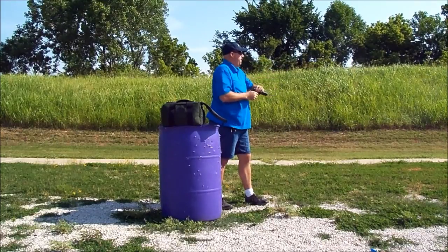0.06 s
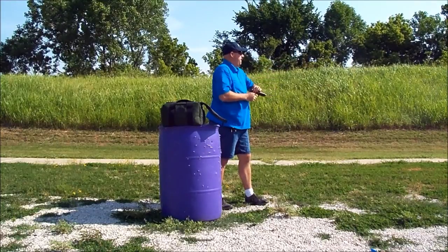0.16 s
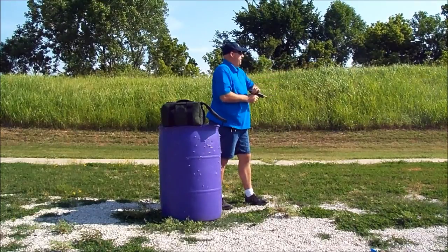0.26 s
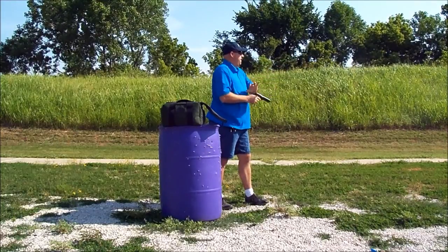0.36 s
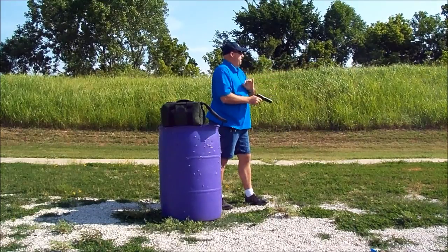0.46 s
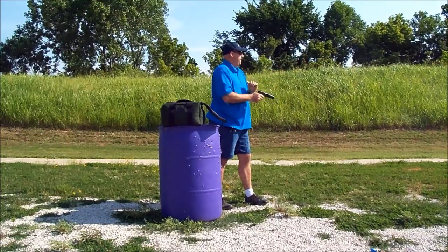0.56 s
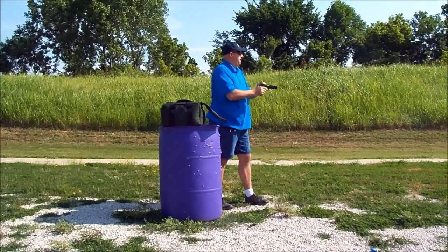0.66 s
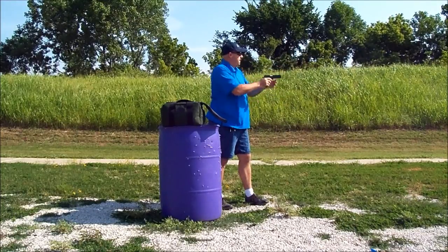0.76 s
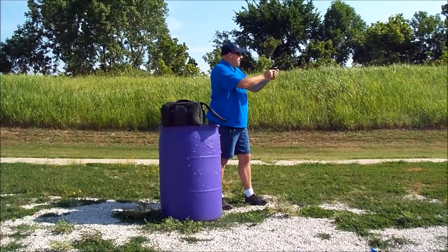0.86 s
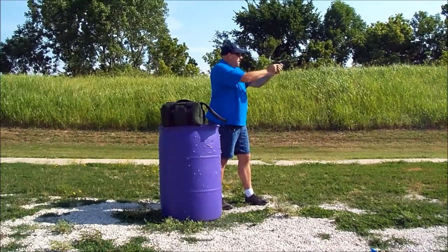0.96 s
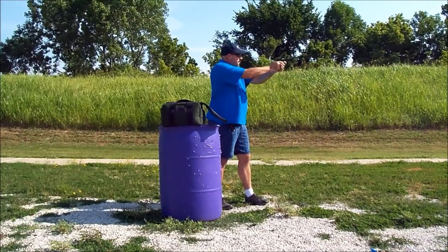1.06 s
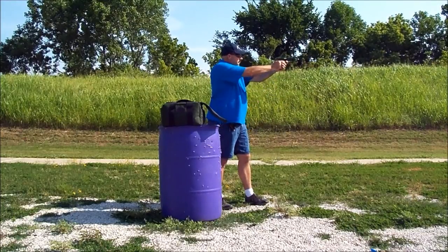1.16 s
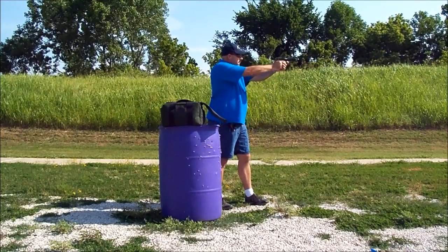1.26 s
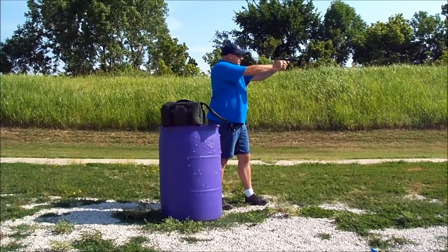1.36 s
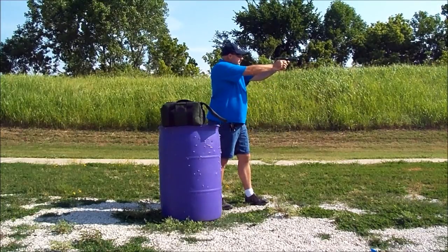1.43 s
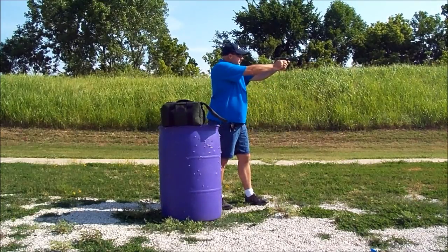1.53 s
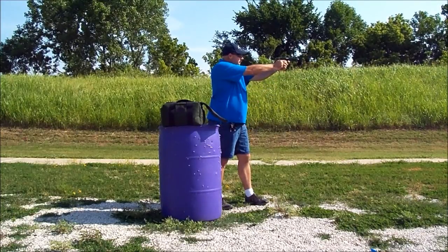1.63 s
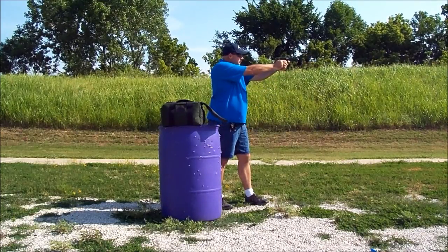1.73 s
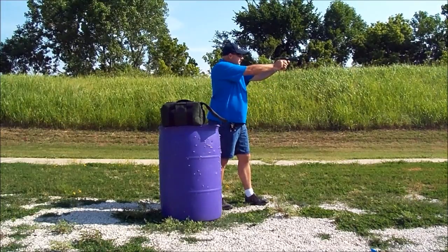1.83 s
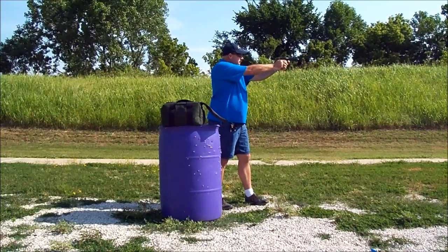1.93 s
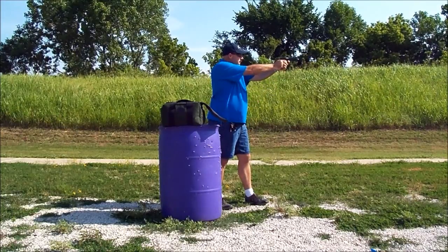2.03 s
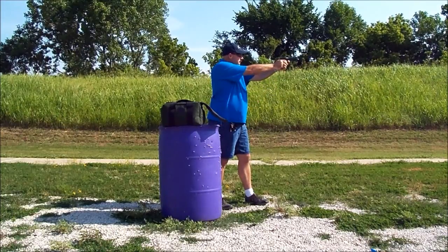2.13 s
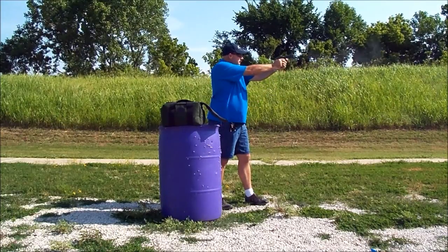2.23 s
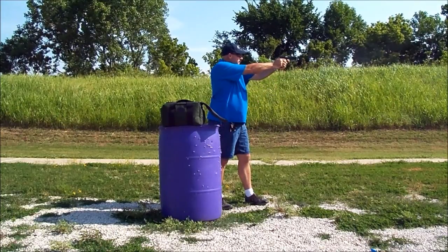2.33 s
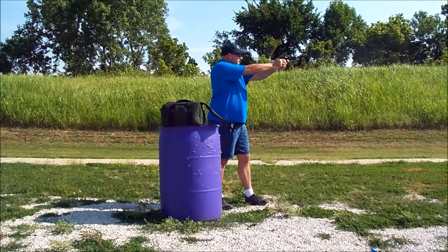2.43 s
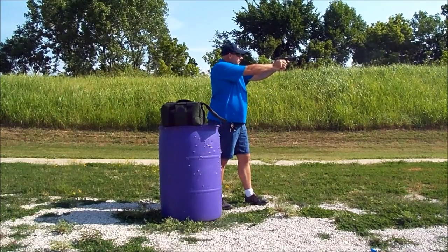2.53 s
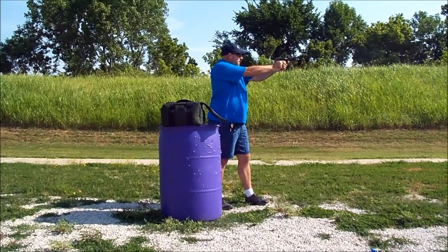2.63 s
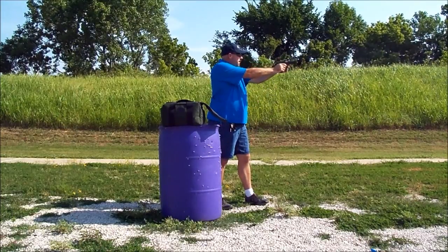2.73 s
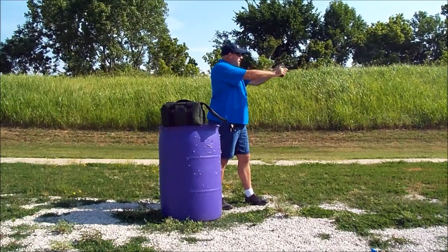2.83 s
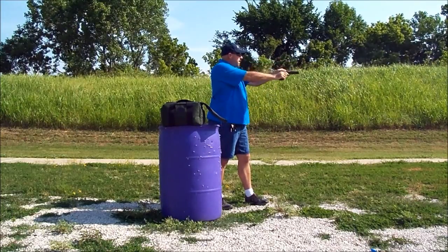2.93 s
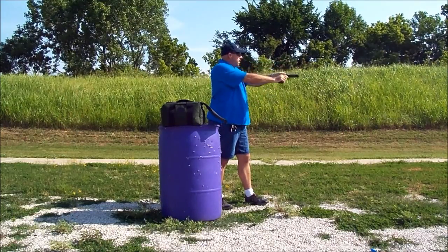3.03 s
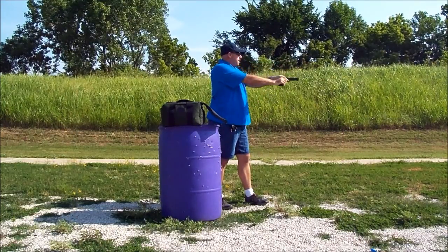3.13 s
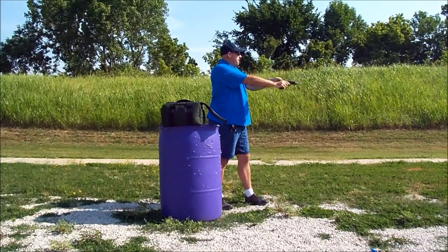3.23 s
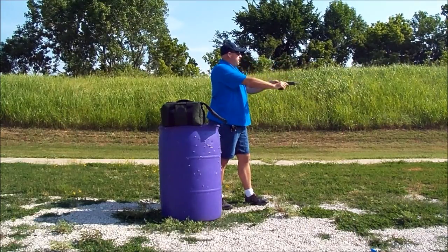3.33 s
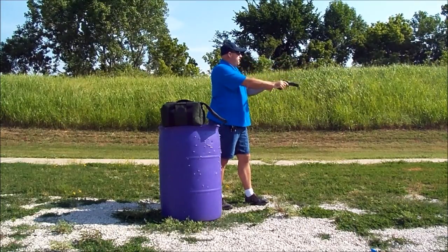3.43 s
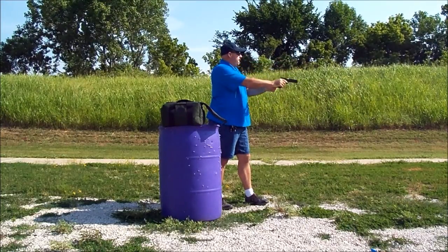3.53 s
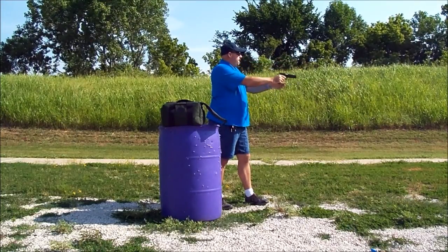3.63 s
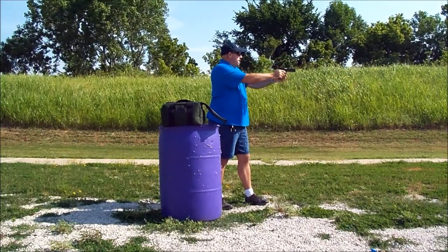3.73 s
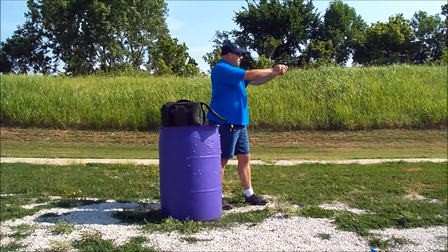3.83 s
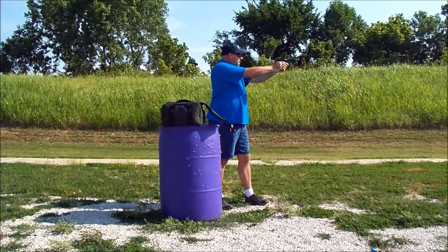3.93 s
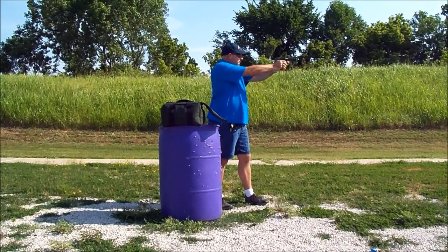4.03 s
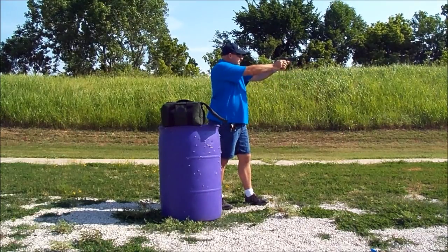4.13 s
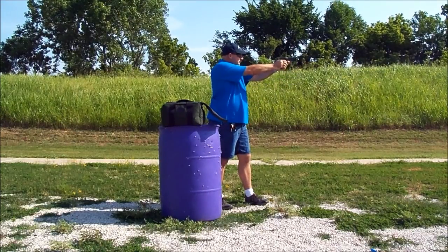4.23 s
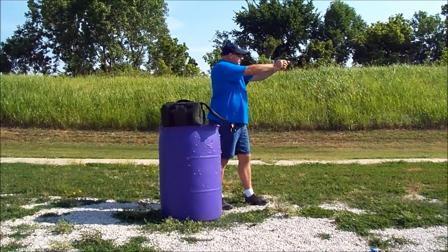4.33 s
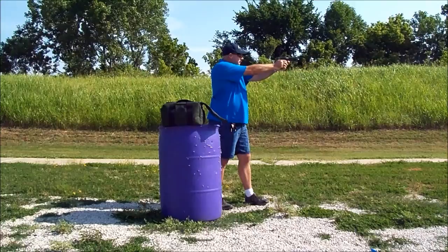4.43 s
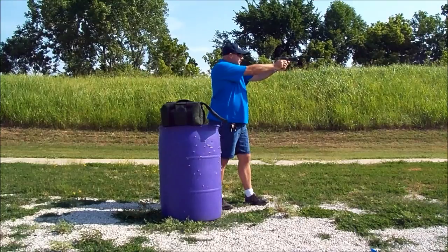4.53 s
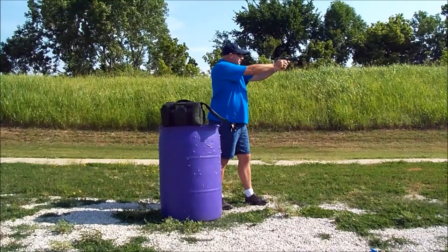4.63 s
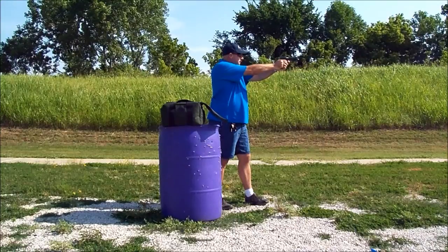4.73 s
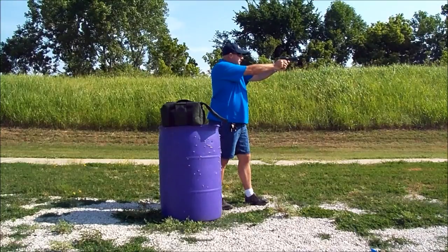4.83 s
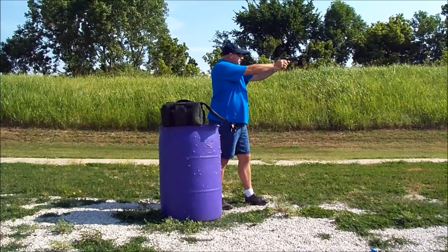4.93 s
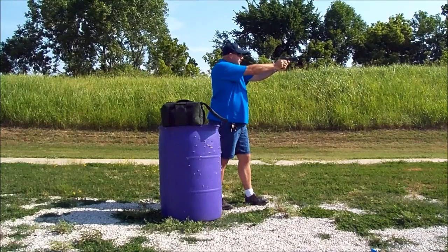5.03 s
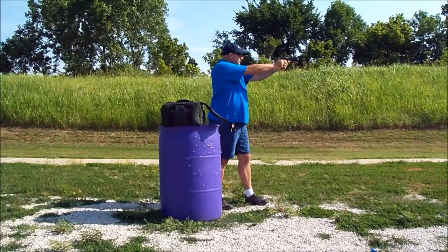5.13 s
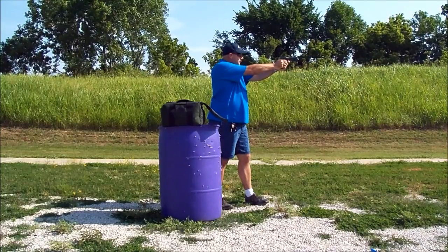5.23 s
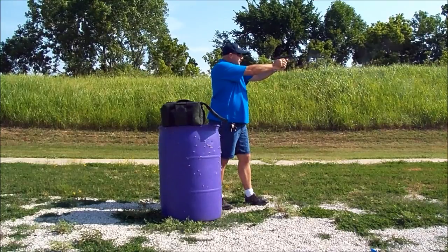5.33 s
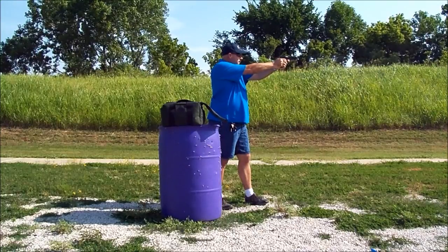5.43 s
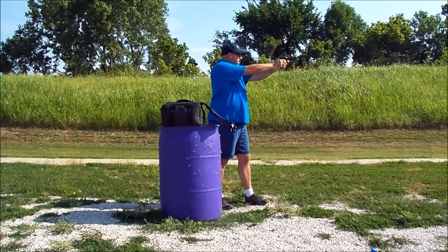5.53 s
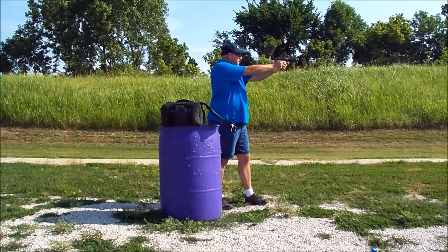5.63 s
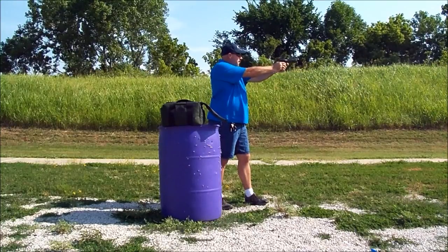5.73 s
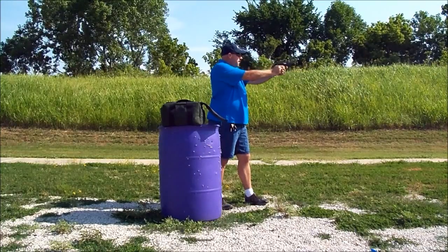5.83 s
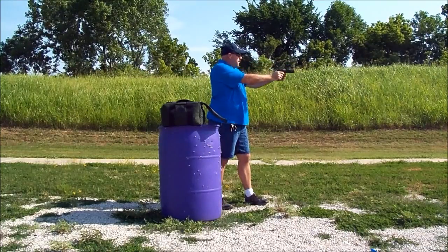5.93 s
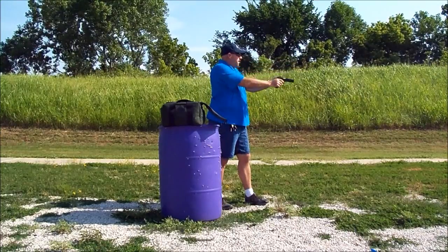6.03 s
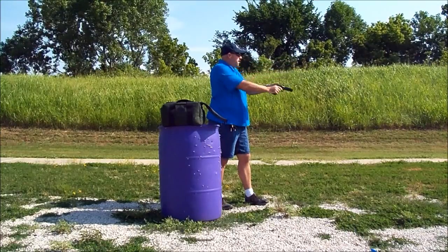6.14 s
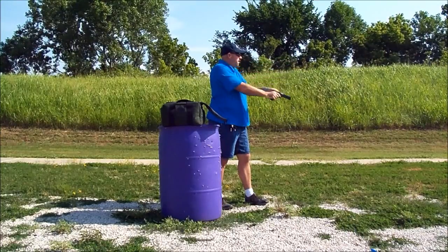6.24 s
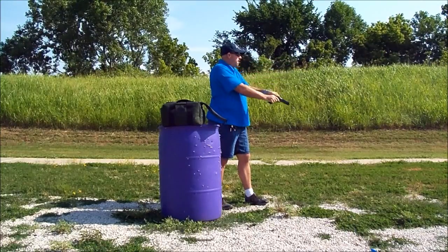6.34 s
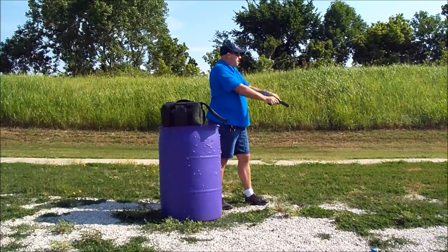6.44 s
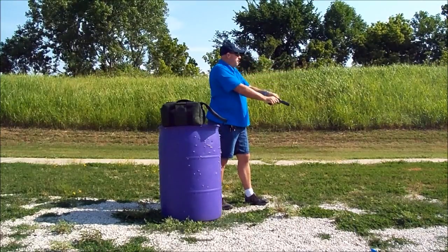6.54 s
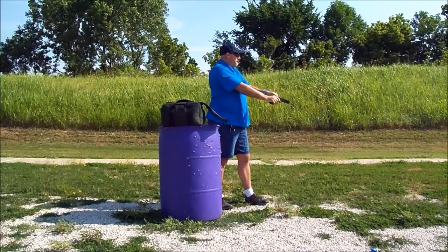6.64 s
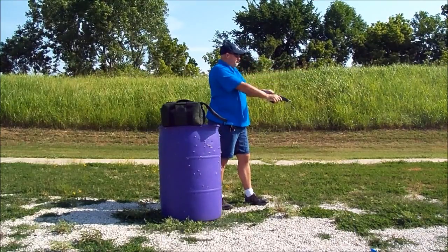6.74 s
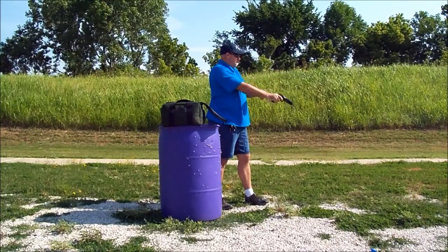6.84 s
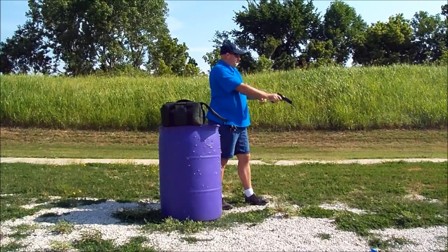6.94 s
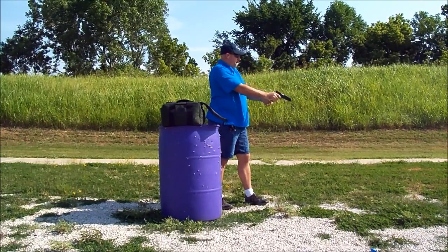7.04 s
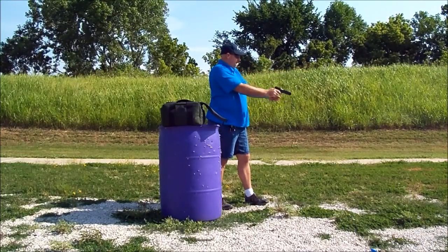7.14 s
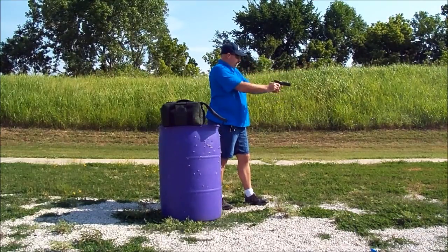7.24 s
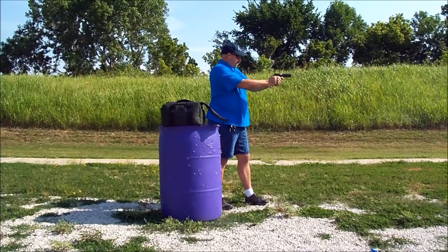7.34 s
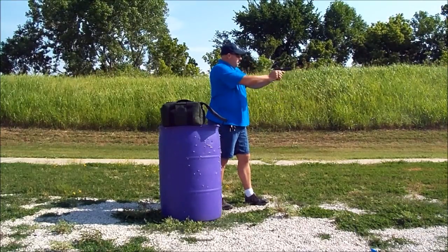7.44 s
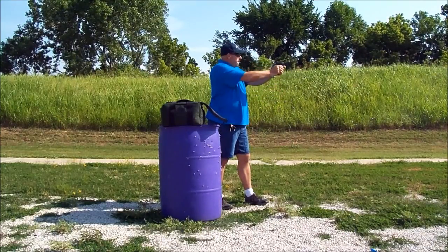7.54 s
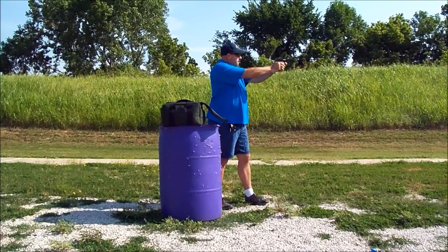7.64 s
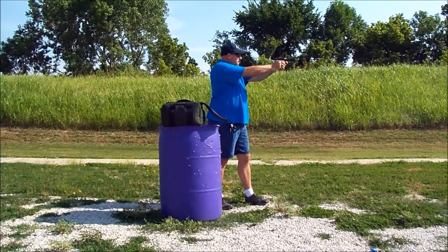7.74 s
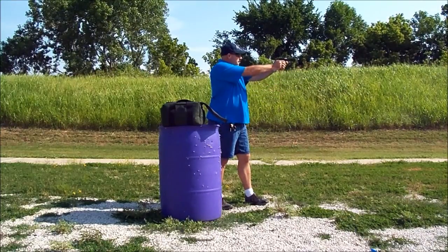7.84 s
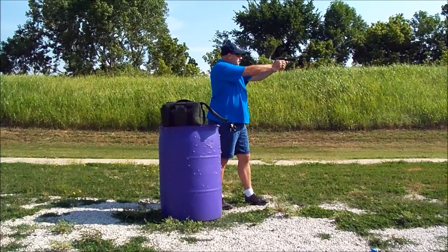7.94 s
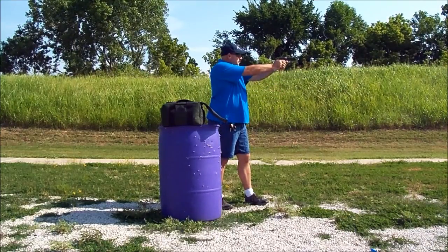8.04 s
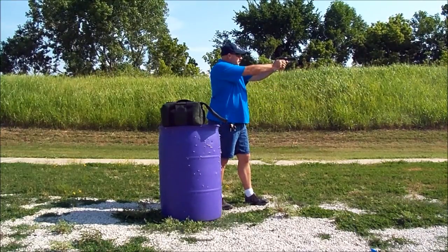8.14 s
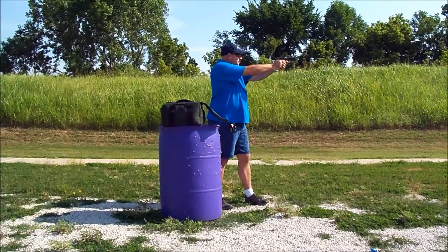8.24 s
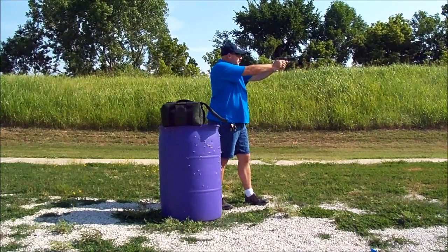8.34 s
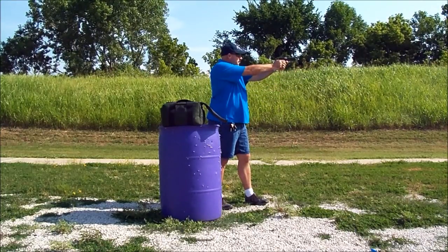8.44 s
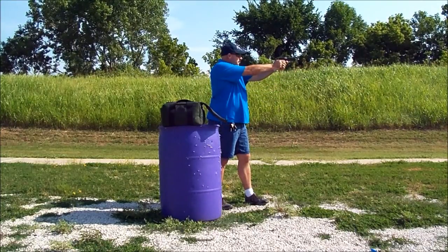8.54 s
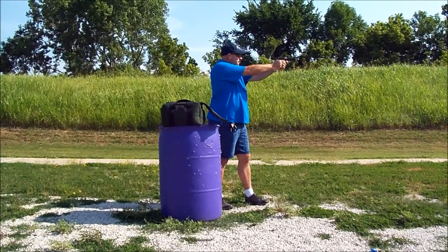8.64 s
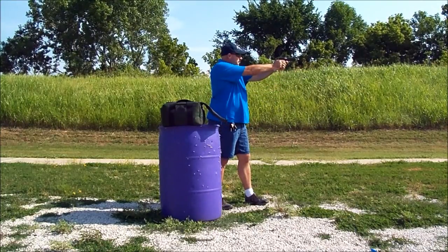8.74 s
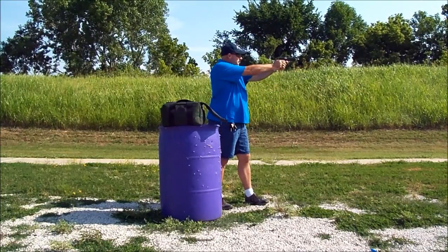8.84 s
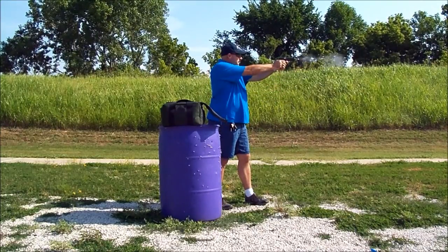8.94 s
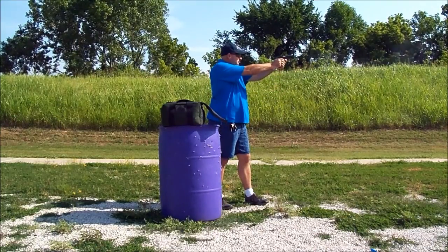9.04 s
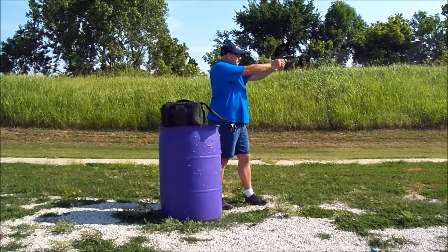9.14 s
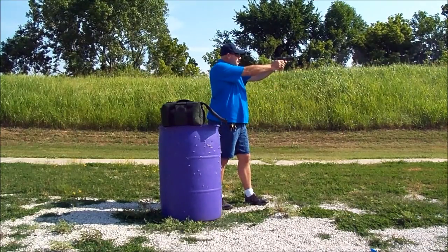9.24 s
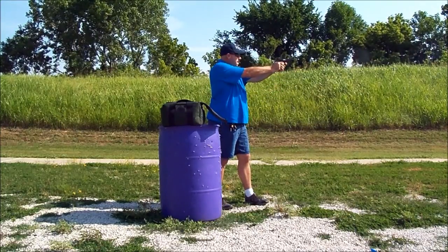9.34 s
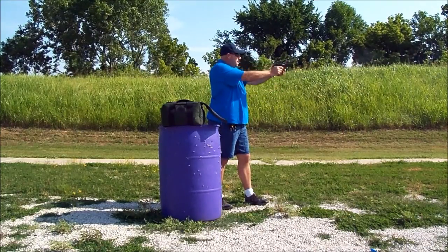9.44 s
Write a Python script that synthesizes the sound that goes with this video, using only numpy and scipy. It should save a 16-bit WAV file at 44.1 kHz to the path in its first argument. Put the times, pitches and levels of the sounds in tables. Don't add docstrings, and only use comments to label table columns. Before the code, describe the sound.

An open grassy shooting range, heard through one microphone that overloads on the shots. At 0.2-0.4 s a pistol slide is racked: scrape, sharp clack, then a louder bright slam; a small click and high ping follow near 0.9. Birds whistle briefly over leaf hiss, insects and a faint low engine. At 2.2 a dry, clipped blast cracks, with low thump and clustered echoes from banks and trees dying within about half a second. A softer rack comes at 3.3-3.4, tiny case tinkles around 4.0-4.2, and the engine fades out by 3.9. The second, harder shot is at 5.3. Wind thumps and soft taps around 6-6.5 lead to another rack at 6.7-6.8, with faint pings at 7.05. Clear bird whistles and wind buffets continue from 6.4 to 8.9; the third, strongest shot hits at 9.0, its echoes trailing off near the end.

```python
import sys
import numpy as np
from scipy import signal
from scipy.fft import rfft, irfft
from scipy.io import wavfile
from scipy.ndimage import uniform_filter1d

SR = 44100
rng = np.random.default_rng(int(sys.argv[2]) if len(sys.argv) > 2 else 0)


def boost(x):
    u = np.asarray(x, float) / 20
    return 10 ** u


def log_audio(samples):
    frames = np.atleast_2d(samples).T
    limited = np.clip(frames, -1, 1)
    pcm = np.round(limited * 32767).astype(np.int16)
    wavfile.write(sys.argv[1], SR, pcm)


N = 418068
FULL_SCALE = 0.44
EDGE_HZ = 14150


def read(points, hz):
    f, value = np.transpose(points)
    return np.interp(np.log(hz + 1), np.log(f + 1), value)


def curve(rows, column=1):
    rows = np.array(rows)
    return np.interp(np.arange(N) / SR, rows[:, 0], rows[:, column], right=rows[-1, column])


def add(mix, start_s, sound):
    part = mix[round(start_s * SR):][:len(sound)]
    part += sound[:len(part)]


def noise(size, colour_db):
    hz = np.fft.rfftfreq(size, 1 / SR)
    x = irfft(rfft(rng.standard_normal(size)) * boost(colour_db(hz)), size)
    return x / np.sqrt(np.mean(x ** 2))


def rings(modes, t):
    return sum(boost(db - 60 * t / t60_s) * np.sin(2 * np.pi * hz * t) for hz, db, t60_s in modes)


# delay in s, level in dB, rise in s, fall in s, bass lift in dB per octave.
BANKS = [(.0, 0.5, 0.0011, 0.0043, -3), (.009, 1, .001, .02, 4.5), (.022, 1, .01, .018, 6),
         (.063, -7, 0.0018, 0.014, 3), (.078, -7, .02, .035, 0.5), (.107, -7, 0.0018, .012, 8.5),
         (.155, -16, .04, 0.052, 0), (.235, -20, 0.0078, 0.028, 2), (.28, -27, .01, .04, 0),
         (.355, -31, 0.0079, 0.035, -1), (.41, -37.5, 0.02, 0.067, -3), (.535, -43, 0.036, .04, -7),
         (.59, -46, 0.012, 0.042, -5)]
# frequency in Hz, density in dB per Hz.
SCATTER = [(35, -53), (60, -24), (81, -26.5), (222, -15.5), (403, -10.5), (442, -10.5), (700, -2),
           (1360, -4), (1530, -8), (2210, -3.5), (12300, -19), (13500, -24), (14500, -36)]


def echoes(banks):
    out, t = np.zeros(SR), np.arange(SR // 2) / SR
    for delay_s, db, rise_s, fall_s, bass_db in banks:
        ripple = rng.standard_normal(60)

        def colour_db(hz):
            bass = bass_db * np.log2(2000 / (hz + 150))
            air = 11.5 * (delay_s - .2) * hz / 1000
            uneven = np.interp(np.sqrt(hz / SR * 2), np.linspace(0, 1, len(ripple)), ripple)
            return read(SCATTER, hz) + bass - air + 2.1 * (1 + delay_s) * uneven

        shape = np.minimum(t / rise_s, 1) * np.exp(-np.maximum(t - rise_s, 0) / fall_s)
        clumps = noise(len(t), lambda hz: -12 * np.log2(1 + hz / 120))
        add(out, delay_s, boost(db + 1.8 * clumps) * shape * noise(len(t), colour_db))
    return out


def pressure_swing():
    t, swing_hz = np.arange(SR) / SR, 39.4
    return -boost(3) * np.sin(2 * np.pi * swing_hz * t / (1 + t / .12)) * np.exp(-t / .017)


def microphone_rumble():
    t60_s = .33
    return boost(-27 - 60 * np.arange(SR) / SR / t60_s) * noise(SR, lambda hz: read(GUST, hz))


def ground_roll():
    size, centre_hz = round(.118 * SR), 340
    roll = noise(size, lambda hz: -15 * abs(np.log2((hz + 1) / centre_hz)))
    return boost(-14 - 6.5 * np.linspace(0, 1, size)) * signal.windows.tukey(size, .3) * roll


# delay in s, length in s, start pitch in Hz, end pitch in Hz, level in dB.
FACES = [(.0018, 0.0032, 1080, 720, 7.5), (.0635, .005, 1300, 888, 0), (0.07, 0.009, 6035, 2768, -8),
         (.108, .004, 900, 700, -1), (0.112, .008, 230, 175, -10.5), (.02, .03, 1494, 1202, -6.5)]


def face_returns():
    out = np.zeros(SR)
    for delay_s, length_s, start_hz, end_hz, db in FACES:
        u = np.linspace(0, 1, round(length_s * SR))
        hz = (end_hz + (start_hz - end_hz) * (1 - u) ** 3) * rng.uniform(.9, 1.1)
        rough = boost(4 * noise(len(u), lambda f: -12 * np.log2(1 + f / 500)))
        tone = np.sin(2 * np.pi * np.cumsum(hz) / SR)
        add(out, delay_s, boost(db) * rough * np.sin(np.pi * u) ** .5 * tone)
    return out


def shot(db):
    out = echoes(BANKS) + microphone_rumble() + face_returns()
    add(out, .0015, pressure_swing())
    add(out, .012, ground_roll())
    return FULL_SCALE * boost(db) * out


# time in s, blast in dB above full scale.
SHOTS = [
    (2.2302, 3.5),
    (5.3368, 7),
    (8.9733, 8),
]


def shots():
    out = np.zeros(N)
    for start_s, db in SHOTS:
        add(out, start_s, shot(db))
    return out


# time in s, peak in dB, stroke as share of the usual.
PULLS = [(.242, -3, 1.0), (3.2748, -10.5, .97), (6.7165, -7, 1.055)]
# lead before the stop in s, level re stop in dB,
# brightness in dB per octave, steel knock in dB.
CATCHES = [(.071, -37, -3, -18), (.0475, -18, -5, -7), (.0265, -21.5, 2.5, -15)]
# time in s, peak in dB, lead of the release click in s.
SLAMS = [(.3682, 1, .0327), (3.3995, -6, .0315), (6.8084, -1.5, .0259)]
# t60 in s, brightness in dB per octave, steel knock in dB, hold in s.
STOP = (.015, .6, -20, .0014)
# t60 in s, brightness in dB per octave, steel knock in dB, hold in s.
SLAM = (.022, 2.6, -21, .0052)
# time in s, peak
# in dB, brightness in dB per octave.
TICKS = [(.2335, -18, -.6), (.349, -9, 6), (.354, -13, 3), (.359, -14, -1.2), (.4085, -31, 1.2),
         (.4356, -34.5, -1.2), (.871, -25, 2.5), (3.151, -36.5, 3.5), (3.3765, -29.5, -2.2),
         (3.975, -35, 6), (4.1126, -45, 9.5), (4.199, -50, 8), (6.705, -22, 4), (6.7917, -15, 4),
         (6.8005, -12, 2.2), (6.876, -29.5, 1.5), (7.0525, -29.5, 9)]


def blows():
    def tick(start_s, db, bright_db, knock_db=-19):
        return start_s, db, .013, bright_db, knock_db, .0018

    rows = [tick(*row) for row in TICKS]
    for stop_s, db, stroke in PULLS:
        for lead_s, below_db, bright_db, knock_db in CATCHES:
            rows.append(tick(stop_s - lead_s * stroke, db + below_db, bright_db, knock_db))
        rows.append((stop_s, db, *STOP))
    for slam_s, db, lead_s in SLAMS:
        rows.append(tick(slam_s - lead_s, db - 28.5, -.4))
        rows.append((slam_s, db, *SLAM))
    return rows


# frequency in Hz, density in dB per Hz.
CLICK = [(200, -51), (400, -27.5), (1900, -11), (2500, -7.5), (3800, -8), (4700, -2), (5500, -6.5),
         (7100, -5), (9000, -8), (12900, -5.5), (14500, -19.5)]
# frequency in Hz, level in dB, t60 in s.
SLIDE = [(4760, 0.5, 0.026), (9610, -1.5, .015), (2300, -18.5, 0.029)]


def clicks():
    out, t = np.zeros(N), np.arange(SR // 4) / SR
    for start_s, db, t60_s, bright_db, knock_db, hold_s in blows():
        peaks_db = 2.2 * rng.standard_normal(28)

        def colour_db(hz):
            uneven = np.interp(hz / EDGE_HZ, np.linspace(0, 1, len(peaks_db)), peaks_db)
            return read(CLICK, hz) + bright_db * np.log2((hz + 300) / 5000) + uneven

        fade = boost(-60 * np.maximum(t - hold_s, 0) / t60_s)
        fade += boost(-27 - 60 * t / .063) + boost(-41 - 60 * t / .28)
        blow = boost(-9) * noise(len(t), colour_db) * fade + boost(knock_db) * rings(SLIDE, t)
        add(out, start_s, boost(db) * blow * np.minimum(t / .0008, 1))
    return out


# time in s, pitch in Hz, level in dB, t60 in s, beat in Hz.
PINGS = [(.236, 11800, -42, .15, 14), (.872, 11850, -31.5, .07, 30), (3.2745, 2180, -22, .017, 5),
         (3.262, 11400, -42, .16, 18), (3.277, 7850, -46, .13, 5), (3.402, 7850, -44, .14, 5),
         (3.98, 11400, -53, .18, 35), (4.1127, 11390, -48, .2, 9), (4.198, 11400, -60.5, .15, 20),
         (6.718, 11420, -39, .16, 30), (6.718, 7830, -55, .08, 5), (6.812, 7830, -47.5, .12, 5),
         (7.054, 11450, -54.5, .2, 20), (7.075, 11450, -47.5, .2, 8)]


def pings():
    out, t = np.zeros(N), np.arange(SR // 4) / SR
    for start_s, hz, db, t60_s, beat_hz in PINGS:
        pair = [(hz - beat_hz / 2, db, t60_s), (hz + beat_hz / 2, db - 6.5, t60_s)]
        add(out, start_s, rings(pair, t) * np.minimum(t / .0039, 1))
    return out


# start in s, end in s, rms in dB.
SCRAPES = [(0.222, 0.252, -38), (.35, 0.371, -32), (3.258, 3.277, -44), (3.374, 3.401, -31.5),
           (6.699, 6.714, -32.5), (6.788, 6.823, -30)]


def scrapes():
    out = np.zeros(N)
    for start_s, end_s, db in SCRAPES:
        size = round((end_s - start_s) * SR)
        grit = boost(22 * uniform_filter1d(rng.standard_normal(size), size=60))
        friction = grit * noise(size, lambda hz: read(CLICK, hz))
        add(out, start_s, boost(db) * friction * signal.windows.tukey(size, .4))
    return out


# time in s, peak in dB, pitch in Hz.
TAPS = [(0.033, -45, 974), (3.869, -47, 784), (6.107, -49, 1750), (6.136, -45, 497), (6.337, -41.5, 1900),
        (6.541, -47.5, 2100), (6.975, -44, 906)]


def taps():
    out, t = np.zeros(N), np.arange(SR // 4) / SR
    for start_s, db, tap_hz in TAPS:
        thud = noise(len(t), lambda hz: -9 * abs(np.log2((hz + 1) / tap_hz)))
        add(out, start_s, boost(db - 2.5 - 60 * t / .03) * thud)
    return out


def action():
    out = clicks() + pings() + scrapes() + taps()
    back, t = boost(-61) * echoes(BANKS[4:]), np.arange(SR // 4) / SR
    add(back, .0675, boost(-51) * rings([(6500, 0, .001), (3500, -2, .002)], t))
    leaves = signal.iirpeak(9100, 7, fs=SR)
    back = back + boost(9) * signal.lfilter(*leaves, back)
    return out + signal.oaconvolve(out, back)[:N]


# start in s, length in s, middle pitch in Hz, level in dB.
RISES = [(.907, .03, 2980, -55), (3.08, .114, 3010, -59.5), (4.413, .055, 3000, -63.5),
         (6.402, .043, 2930, -50), (7.199, .057, 2930, -48.5), (7.945, .038, 2770, -58),
         (8.545, .025, 2797, -52.5), (8.628, .169, 3820, -66), (8.04, .14, 3880, -68)]
HOOKS = [(1.238, .034, 3400, -51), (4.682, .04, 2920, -58), (6.675, .051, 2840, -52.5),
         (7.49, .046, 2810, -47.5)]
HOLDS = [(.482, .035, 3000, -57), (.7, .035, 2980, -63), (4.46, .068, 3150, -70),
         (6.428, .091, 3110, -51.5), (7.235, .078, 3040, -50.5), (7.975, .06, 3650, -60),
         (8.447, .028, 2370, -63), (8.558, .068, 3670, -60.5)]
ARCHES = [(4.59, .06, 4070, -69.5), (6.57, .067, 4090, -57), (7.37, .103, 4000, -56.5),
          (8.79, .046, 4290, -57)]
SWOOPS = [(1.304, .05, 2830, -50)]
DIVES = [(1.192, .032, 2780, -58), (4.73, .034, 2520, -62.5), (7.538, .018, 2570, -54.5)]
PLUNGES = [(8.201, .025, 3200, -55), (8.816, .048, 3600, -54)]
DROOPS = [(.53, .09, 2250, -57.5), (.83, .042, 2750, -57), (.952, .078, 2360, -57),
          (8.225, .045, 2400, -57.5), (8.85, .038, 2560, -56.5)]
SONG = [(RISES, .953, 1.05), (HOOKS, .945, 1.135), (HOLDS, 1.005, 1.03), (ARCHES, .94, .945),
        (SWOOPS, .9, .85), (DIVES, 1.19, .9), (PLUNGES, 1.08, .785), (DROOPS, 1.095, .98)]


def birds():
    out = np.zeros(N)
    for rows, first, last in SONG:
        for start_s, length_s, middle_hz, db in rows:
            u = np.linspace(-1, 1, round(length_s * SR))
            hz = middle_hz * (1 + (last - first) / 2 * u + ((first + last) / 2 - 1) * u ** 2)
            flutter = boost(2.45 * noise(len(u), lambda f: -12 * np.log2(1 + f / 29)))
            whistle = np.sin(2 * np.pi * np.cumsum(hz) / SR)
            add(out, start_s, boost(db) * flutter * (1 - u ** 2) ** .47 * whistle)
    return out + boost(-12) * np.roll(out, round(.014 * SR))


# time in s, level in dB.
WIND = [(0, -52), (1.2, -54.5), (1.6, -49), (2.06, -54), (2.6, -52.5), (3.7, -53), (4.45, -55), (4.7, -48),
        (5.2, -52), (5.7, -48.5), (6.15, -40.5), (6.55, -46), (6.7, -41), (7.1, -55), (7.55, -40),
        (8.0, -54), (8.8, -48), (9.48, -52)]
# frequency in Hz, density in dB per Hz.
GUST = [(8.8, -30.5), (15, 1.5), (70, -3), (124, -11.5), (255, -32.5), (401, -33), (432, -38), (500, -33),
        (650, -63.5), (1100, -120)]
# time in s, peak in dB, pitch in Hz.
THUMPS = [(0.568, -32.5, 32.3), (1.629, -31, 42.6), (4.649, -39, 32.3), (4.728, -33, 59.4),
          (5.017, -35, 32.3), (6.039, -26, 64.6), (6.239, -26, 67.5), (6.679, -33.5, 45.8),
          (7.45, -25.5, 32.5), (7.519, -29, 32.3), (7.798, -36, 86.1), (8.5, -44.5, 118),
          (8.719, -26.5, 35.0)]


def wind():
    lumps = noise(N, lambda hz: -9 * abs(np.log2((hz + 1) / 12)))
    out = boost(curve(WIND) + 4 * lumps) * noise(N, lambda hz: read(GUST, hz))
    u = np.linspace(0, 1, 1600)
    for peak_s, db, hz in THUMPS:
        swing = np.sin(2 * np.pi * (hz * u * len(u) / SR + rng.random()))
        add(out, peak_s - .015, boost(db - 2) * np.sin(np.pi * u) ** 2 * swing)
    return out


# frequency in Hz, density in dB per Hz.
FIELD = [(88, -27), (150, -6.5), (196, -10.5), (390, -16.5), (595, -19.5), (642, -20), (823, -21),
         (1740, -26), (1870, -27), (3020, -29), (4100, -28.5), (4520, -28), (5790, -34.5), (13200, -38),
         (14500, -46)]
# time in s, field level in dB.
FIELD_DB = [(0, -55), (1, -56), (2.2, -57), (3.0, -56), (3.6, -59), (4.2, -61.5), (4.72, -61),
            (4.82, -51.5), (5.3, -51), (6.2, -53.2), (6.6, -55.5), (7.1, -55), (7.6, -57.5), (8.2, -59),
            (8.7, -58), (8.8, -52), (9.48, -55)]


def field():
    swell = noise(N, lambda hz: -12 * np.log2(1 + hz / 3))
    hiss = boost(curve(FIELD_DB) + 1.6 * swell) * noise(N, lambda hz: read(FIELD, hz))
    insect_hz, width_hz, insect_db = 4570, 220, -17
    insects = noise(N, lambda hz: -6 * ((hz - insect_hz) / width_hz) ** 2)
    return hiss + boost(curve(FIELD_DB) + insect_db + 2 * swell) * insects


# time in s, pitch in Hz, level in dB.
DRONE = [(0, 136, -50.5), (.6, 137, -50.5), (1.2, 133, -52.5), (2.2, 132, -51), (3.0, 131, -53),
         (3.5, 132, -62.5)]


def far_engine():
    waver = noise(N, lambda hz: -12 * np.log2(1 + hz / 4.1))
    fade = np.clip((3.9 - np.arange(N) / SR) / .37, 0, 1)
    drone = np.sin(2 * np.pi * np.cumsum(curve(DRONE) + 1.3 * waver) / SR)
    return boost(curve(DRONE, column=2) + .5 + waver) * fade * drone


def scene():
    mix = shots() + action() + birds() + wind() + field() + far_engine()
    return mix[None]


def top_cut(x):
    return signal.sosfilt(signal.butter(12, 15260, fs=SR, output="sos"), x)


def record(dry):
    clipped = dry / (1 + abs(dry / FULL_SCALE) ** 12) ** (1 / 12)
    drain_hz = 3.7
    drained = signal.lfilter([1, -1], [1, -np.exp(-2 * np.pi * drain_hz / SR)], clipped)
    band = signal.firwin(401, EDGE_HZ, window=("kaiser", 7), fs=SR)
    return top_cut(signal.oaconvolve(drained, band[None], "same"))


dry = scene()
out = record(dry)
log_audio(out)
```